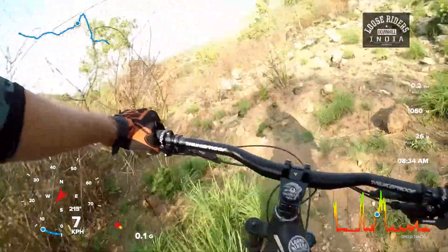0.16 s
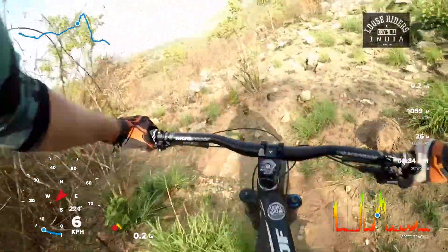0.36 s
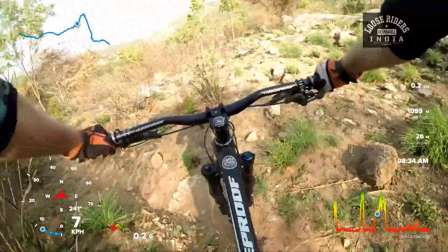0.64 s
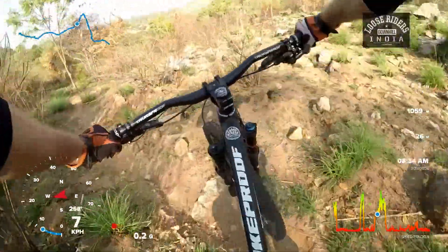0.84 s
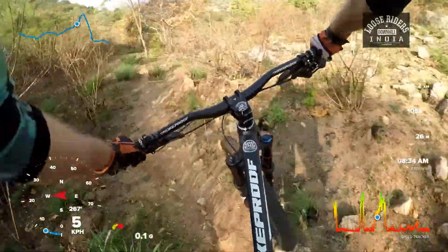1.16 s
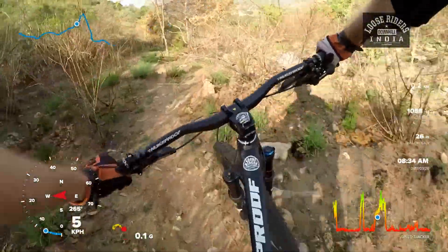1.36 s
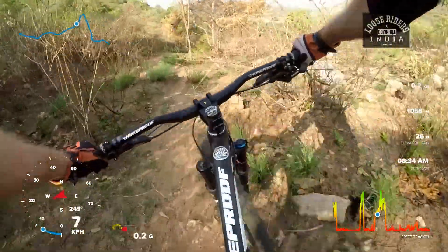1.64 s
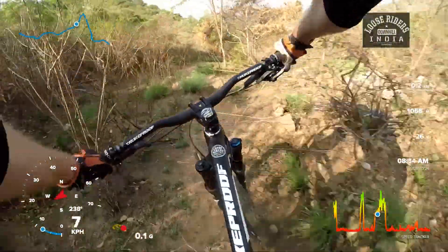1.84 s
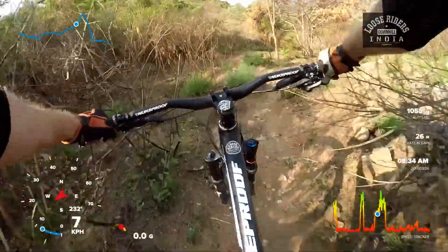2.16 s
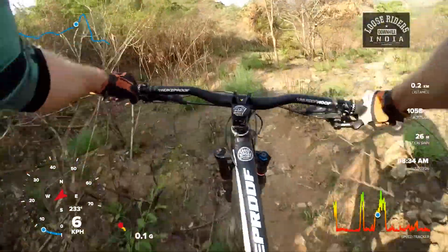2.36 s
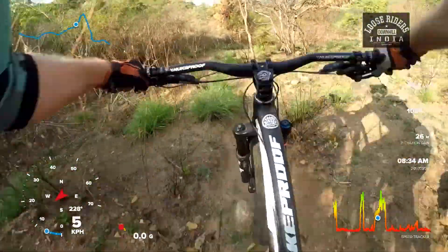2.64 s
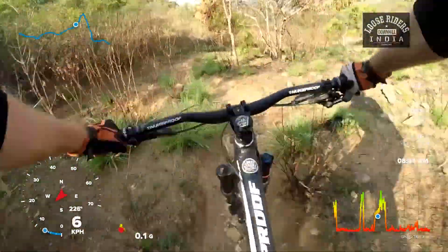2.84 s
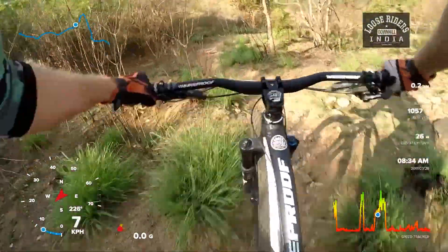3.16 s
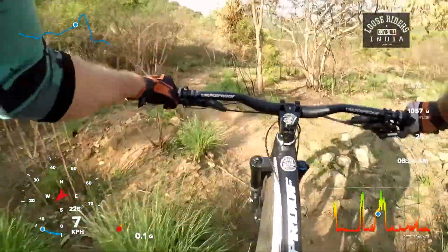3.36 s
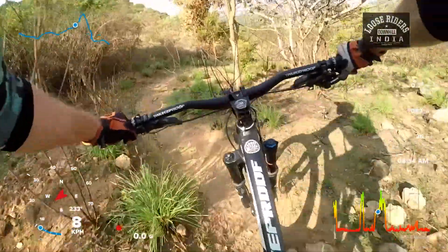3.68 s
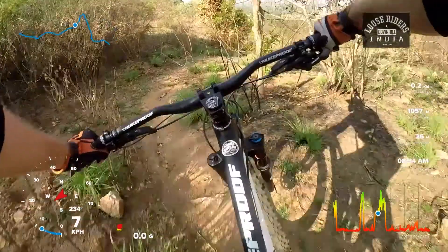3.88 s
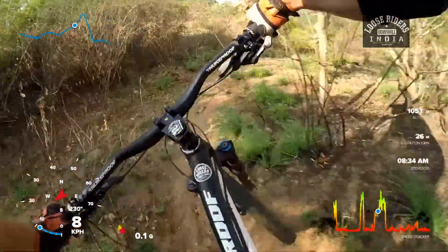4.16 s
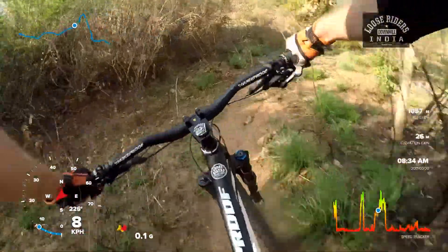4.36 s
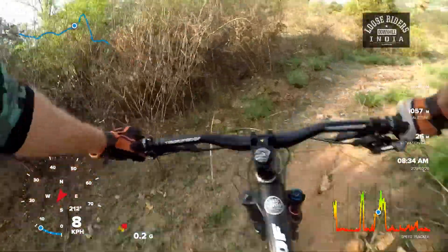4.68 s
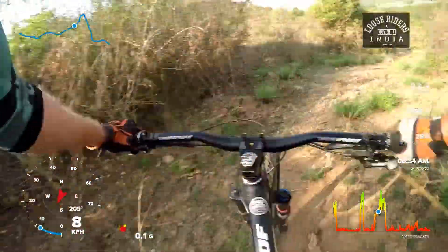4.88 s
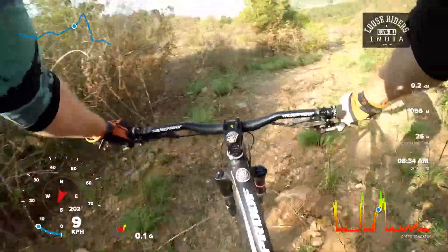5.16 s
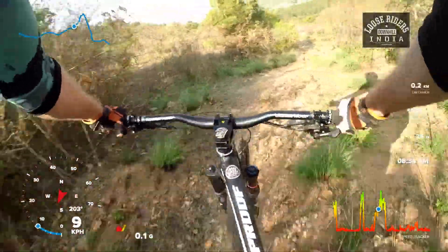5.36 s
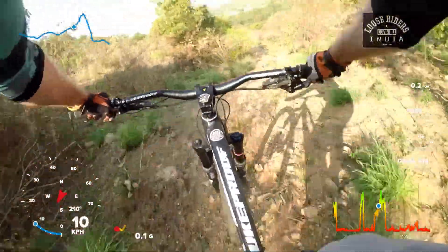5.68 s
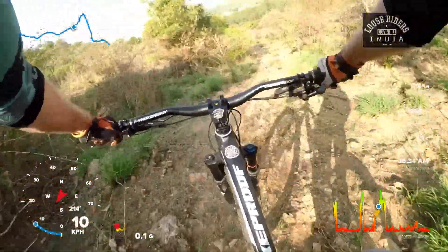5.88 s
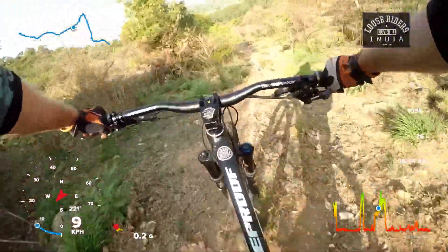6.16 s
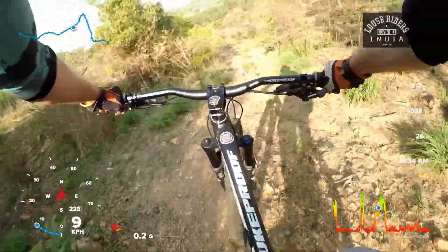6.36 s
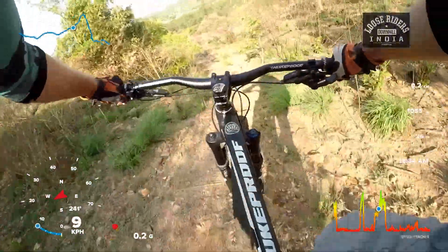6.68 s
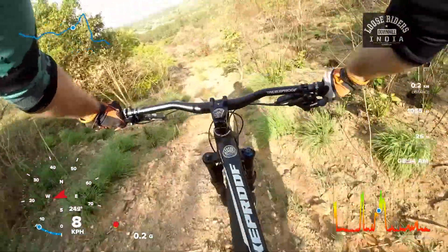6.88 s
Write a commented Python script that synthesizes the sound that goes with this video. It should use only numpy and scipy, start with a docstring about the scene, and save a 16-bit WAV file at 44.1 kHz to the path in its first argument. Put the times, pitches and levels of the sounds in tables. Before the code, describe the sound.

A mountain bike descends a dry rocky trail, heard very close from the rider's chest, outdoors and without echo. The first 0.15 seconds are a dense clatter of knocks, snaps and thuds. Grit then crunches unevenly under the tyres over low, buffeting wind and shuddering straps, with soft frame thuds near 0.3, 0.8 and 1.2. Bright stone cracks cluster around 1.6 to 1.8, another at 2.1, and a heavier thud lands at 2.8. From 3.2 to 4.1 the crunching is thickest, full of snaps, short pings and scrapes, with a strong thud at 3.75. More jolts at 4.4 to 4.7 lead to a sharp ringing knock at 4.77, then sudden near-silence. Faint grit returns from 5.0, gradually building; thuds hit at 6.15 and 6.35, a crisp crack at 6.65, and a last bump at 7.0. Tiny, extremely high brake squeaks flutter now and then.

```python
"""Dry, rocky trail: a mountain bike rolls down it, heard from a chest-mounted camera.
Filtered noise makes wind, strap and frame rumble, and grit crunching under the tyres; noise bursts make
snapping stones and twigs; decaying sines make frame thuds, mount knocks, pings and sideways rocking.
Resonant noise makes scrapes, a fluttering sine the very high brake squeaks.
A sharp knock near 4.77 s is followed by a sudden hush that fills up again slowly."""
import sys
import numpy as np
from scipy import signal
from scipy.fft import rfft, irfft, next_fast_len
from scipy.io import wavfile
from scipy.ndimage import uniform_filter1d, map_coordinates

SR = 44100
rng = np.random.default_rng(int(sys.argv[2]) if len(sys.argv) > 2 else 0)


def unload_audio(sound):
    """Save the sound as a 16-bit wav file, at the path given as the first command line argument."""
    columns = np.transpose(np.atleast_2d(sound))
    # keep every value between -1 and 1, then stretch to whole-number steps
    steps = np.round(np.clip(columns, -1, 1) * 32767)
    wavfile.write(sys.argv[1], SR, steps.astype(np.int16))


N = 310023

# base level of tyre grinding: (time [s], level [dB])
GRIND = [(0, -31), (.28, -39), (.5, -36.5), (.88, -37), (1.18, -42.5), (1.3, -36), (1.75, -37.5),
         (2.1, -40), (2.45, -34), (2.76, -36.5), (3.12, -38), (3.4, -31.5), (3.85, -29.5), (4.1, -35.5),
         (4.6, -35.5), (5.1, -32), (5.5, -44.5), (5.75, -35), (6.1, -40.5), (6.5, -37.5), (6.7, -29),
         (6.8, -40), (7.03, -42.5)]
GAP_DB, GAP_S, LOW_GAP_S = -30, 0.15, 0.039  # short gap at the start of the hush: depth, decay; low-sound decay
SHUDDER_FOLLOWS = 0.71  # dB of shaking per dB of grinding


def amp(db):
    """Gain of a level in dB."""
    return 10 ** (np.asarray(db) / 20)


def unit(x):
    """x at rms 1."""
    return x / np.sqrt(np.mean(x ** 2) + 1e-20)


def along(points, hz):
    """Interpolates (Hz, value) points on a log frequency axis."""
    f, v = np.transpose(points)
    return np.interp(np.log(hz + 1), np.log(f + 1), v)


def clock():
    """Time of each sample in s."""
    return np.arange(N) / SR


def curve(rows):
    """Interpolates (s, value) rows to one value per sample."""
    return np.interp(clock(), *np.transpose(rows))


def wobble(rate_hz):
    """Smooth random curve with rate_hz knots a second."""
    return map_coordinates(rng.standard_normal(int(N * rate_hz / SR) + 4), [np.arange(N) * rate_hz / SR])


def filtered(x, response):
    """x through a complex response of frequency."""
    m = next_fast_len(N + 8192)
    return irfft(rfft(x, m) * response(np.fft.rfftfreq(m, 1 / SR)), m)[..., :N]


def coloured(x, spectrum):
    """x shaped by a (Hz, dB) spectrum, at rms 1."""
    return unit(filtered(x, lambda hz: amp(along(spectrum, hz))))


def add(track, s, sound):
    """Mixes a sound in at time s."""
    part = track[..., round(s * SR):round(s * SR) + sound.shape[-1]]
    part += sound[..., :part.shape[-1]]


def granular(rate_hz, spread_db, life_s, share):
    """Two noise streams with common random bursts of decay life_s, over a share of steady hiss."""
    starts = (rng.random(N) < rate_hz / SR) * amp(spread_db * rng.uniform(-1.1, 1, N))
    bursts = signal.lfilter([1], [1, -np.exp(-1 / (life_s * SR))], starts)
    return (share + unit(bursts)) * rng.standard_normal((2, N))


def hush(gap_db, gap_s, close_s=0.0032):
    """Level change in dB after the sharp knock: a fast fall, a short deep gap, a slow refill."""
    start_s, depth_db, refill_s = 4.7702, -15.5, 1.535
    t = np.maximum(clock() - start_s, 0)
    refill_db = depth_db * np.clip(1 - t / refill_s, 0, 1)
    return np.clip(t / close_s, 0, 1) * (refill_db + gap_db * np.exp(-t / gap_s))


def grinding():
    """Level and fineness of the grinding in dB: each crushed patch of stones is one swell."""
    # patches of stones: (centre [s], swell [dB], length [s], fineness [dB])
    patches = [(0.007, 7, 0.067, 3.5), (.098, 4, .05, -4), (0.375, 7, 0.15, 1.5), (0.602, 5, 0.018, 5),
               (0.828, 4.5, 0.3, -2.5), (1.625, 4.5, 0.077, 6), (1.755, 1, 0.028, 8),
               (1.92, 3.5, 0.26, 1.5), (2.339, 4, 0.088, 5), (2.497, 4.5, 0.16, 2), (2.911, 7, 0.35, -1),
               (3.219, 8, 0.042, -7.5), (3.34, 7, 0.19, -6), (3.525, 3, 0.1, 7), (3.634, -1, 0.06, 9),
               (3.885, 10.5, 0.05, 4), (3.957, 6.5, 0.028, -0.5), (4.056, 11.5, 0.19, -1.5),
               (4.32, 3, 0.12, 1), (4.726, 4.5, 0.13, 5), (4.872, 0, 0.022, 7), (5.02, 7, 0.034, 9.5),
               (5.084, 6.5, 0.035, 9), (5.539, 5.5, 0.078, 2), (5.93, 3, 0.14, 1), (6.043, 4.5, 0.13, -5),
               (6.23, 6, 0.087, 0), (6.577, 5, 0.096, -1.5), (6.655, 3.5, 0.039, 1), (6.954, 7.5, 0.21, -4)]
    s, swell_db, length_s, fine_db = np.transpose(patches)
    swell = np.clip(1 - np.abs(clock()[:, None] - s) / (.5 * length_s), 0, 1)
    return curve(GRIND) + swell @ swell_db, np.sqrt(swell) @ fine_db


def rumble():
    """Wind buffets the ports in lumps; loose straps and frame shudder above it, harder with the grinding."""
    # noise spectra before levelling: (frequency [Hz], level [dB per Hz])
    wind_colour = [(5.9, -30), (10, 2.5), (28, 0.5), (70, -17), (90, -19), (120, -34), (200, -120)]
    shudder_colour = [(41, -34), (70, -6), (113, -5.5), (254, -15.5), (332, -17.5), (450, -20.5),
                      (600, -32.5), (800, -43.5), (1410, -88)]
    # wind strength: (time [s], level [dB])
    gusts = [(0, -13), (.2, -15.5), (.38, -22.5), (.57, -11), (.7, -21), (.88, -12.5), (1.2, -22.5),
             (1.5, -10.5), (1.75, -21.5), (2.3, -16.5), (2.6, -15.5), (2.95, -10.5), (3.3, -15.5),
             (3.55, -14), (3.83, -16), (4.1, -13.5), (4.3, -20), (4.55, -28), (4.7, -16), (5.1, -20.5),
             (5.3, -14.5), (5.55, -22.5), (5.63, -17.5), (5.8, -21.5), (6.07, -22), (6.3, -25), (6.56, -20),
             (6.9, -29), (7.03, -5.5)]
    # shaking on top of its share of the grinding: (time [s], level [dB])
    shake = [(0, 2), (.4, -7), (1.2, -6.5), (2, -9), (2.6, -7), (3, -1), (3.5, -6), (4.2, -6), (4.75, -3),
             (4.9, 0.5), (5.15, -1), (5.4, -9), (5.7, -5.5), (6.2, -7.5), (7.03, -3.5)]
    wind = coloured(rng.standard_normal((2, N)), wind_colour)
    shudder = coloured(granular(rate_hz=60, spread_db=2.0, life_s=0.013, share=0.88), shudder_colour)
    wind_db = curve(gusts) + 4 * wobble(14)
    shudder_db = curve(shake) + SHUDDER_FOLLOWS * grinding()[0] + 1.5 * wobble(20)
    low_hush_db = hush(-28, LOW_GAP_S, close_s=0.029)
    return amp(low_hush_db) * (amp(wind_db) * wind + amp(shudder_db) * shudder)


def pebbles(count, hz, octaves, cycles, spread_db):
    """Two streams of tiny cracks, each a damped sine at its own pitch."""
    when, pitch, size, side = rng.random((count, 4)).T
    pitch_hz = (hz * 2 ** (octaves * (2 * pitch - 1)))[:, None]
    t = np.arange(192)[None] / SR
    rings = np.sin(2 * np.pi * pitch_hz * t) * np.exp(-t * pitch_hz / cycles)
    rings = amp(spread_db * size ** 2)[:, None] * rings
    where = ((when * N).astype(int)[:, None] + np.arange(192)).ravel()
    turn = 2 * np.pi * side[:, None]
    return unit(np.array([np.bincount(where, (rings * w).ravel())[:N] for w in (np.cos(turn), np.sin(turn))]))


def patchy(x, depth_db):
    """Random gain patches, about 860 Hz by 20 ms, that vary the colour of the stones."""
    z = signal.stft(x, nperseg=256)[2]
    field = uniform_filter1d(rng.standard_normal(z.shape[1:]), size=5, axis=0)
    field = uniform_filter1d(field, size=7, axis=1)
    return signal.istft(z * amp(depth_db * unit(field)), nperseg=256)[1][:, :N]


def tyres():
    """One stream of crushed grains in three bands, coarse, middle and fine; the level flutters over the stones."""
    # band spectra before levelling: (frequency [Hz], level [dB per Hz])
    gravel_colour = [(320, -31), (550, 10), (650, -0.5), (934, 7.5), (1490, -3.5), (2000, -35), (2600, -78),
                     (4400, -120)]
    crunch_colour = [(1000, -12), (1700, -9), (1850, -3.5), (2180, -6.5), (2370, -2), (4500, -9),
                     (5850, -16.5), (9900, -120)]
    grit_colour = [(2470, -36), (4200, -14), (5950, 3.5), (6870, 2.5), (11300, -16.5), (13400, -16),
                   (14600, -25), (16000, -66)]
    grind_db, fine_db = grinding()
    swells_db = grind_db - curve(GRIND)
    grains = unit(granular(rate_hz=500, spread_db=3.5, life_s=0.0051, share=0.53))
    cracks = pebbles(count=14000, hz=3500, octaves=1.5, cycles=2.5, spread_db=10)
    grains = grains + amp(-9 + 0.48 * swells_db) * cracks  # rougher in the swells
    grains = patchy(grains, depth_db=2.0)
    # coarse and fine levels against the middle band
    gravel_db = -8 - 1.17 * fine_db + 2.4 * wobble(7)
    grit_db = -4.5 + fine_db + 1.56 * wobble(7.9)
    bands = (coloured(grains, crunch_colour) + amp(gravel_db) * coloured(grains, gravel_colour)
             + amp(grit_db) * coloured(grains, grit_colour))
    return amp(grind_db + hush(GAP_DB, GAP_S) + 0.72 * wobble(35)) * bands


def rocking():
    """Jolts ring two sideways modes; uneven shaking, stronger with the grinding, keeps the lower one murmuring."""
    # sideways jolts: (time [s], level [dB])
    jolts = [(.149, -19), (.263, -17.5), (.523, -18), (.783, -27), (1.092, -17), (1.222, -18), (1.362, -24),
             (1.701, -6.5), (2.076, -13), (2.254, -24), (2.544, -27), (2.827, -14), (2.992, -18.5),
             (3.135, -27), (3.751, -15.5), (3.938, -40.5), (4.278, -16.5), (4.402, -6.5), (4.495, -21),
             (4.633, -14), (4.741, -15), (4.766, -20), (6.15, -12), (6.351, -20), (6.66, -9.5),
             (7.002, -17)]
    # sideways modes of the camera on its mount: (frequency [Hz], t60 [s])
    modes = [(590, 0.099), (1400, 0.035)]
    upper_db, murmur_db, murmur_width_hz = -2, -18.5, 45
    out, t = np.zeros(N), np.arange(SR // 6) / SR
    (low_hz, low_t60), (high_hz, high_t60) = modes
    for s, db in jolts:
        low = amp(-60 * t / low_t60) * np.sin(2 * np.pi * low_hz * rng.normal(1, 0.0038) * t)
        high = amp(upper_db - 60 * t / high_t60) * np.sin(2 * np.pi * high_hz * rng.normal(1, 0.11) * t)
        add(out, s, amp(db) * (1 - np.exp(-t / 0.0037)) * (low + high))
    shake = granular(rate_hz=23, spread_db=14.0, life_s=0.014, share=0.21)[0]
    murmur = filtered(shake, lambda f: 1j * f / (low_hz ** 2 - f * f + 1j * f * murmur_width_hz))
    level_db = SHUDDER_FOLLOWS * grinding()[0] + hush(GAP_DB, GAP_S) + murmur_db
    return amp(hush(GAP_DB, LOW_GAP_S)) * out + amp(level_db) * unit(murmur)


def knocks():
    """The plastic camera mount rings briefly at each knock; hard knocks excite its upper modes more."""
    # knocks: (time [s], level [dB], hardness: gain of the upper modes [dB])
    events = [(.019, -20, 0), (.003, -24, -14), (.033, -30, -14), (.048, -22, -11), (.057, -24, -16),
              (.067, -22, -12.5), (0.092, -13.5, -14), (0.131, -20, -12), (0.263, -27, -11),
              (1.738, -23, -13), (3.727, -19, -2), (3.766, -25, -5), (4.641, -27, 6), (4.792, -45, 16),
              (5.793, -22.5, -2), (5.814, -33, -14), (5.943, -31, -14), (5.957, -29, -16),
              (5.991, -25, -14), (6.006, -19, -16), (6.03, -36, -14), (6.05, -38, -14), (7.003, -25, 10.5)]
    # mount modes, levels before hardness and random spread: (frequency [Hz], level [dB], t60 [s])
    modes = [(960, 0, .018), (1300, -6, .012), (1620, -2, .013), (2400, -7, .01), (5800, -14, .006)]
    out, t = np.zeros(N), np.arange(SR // 20) / SR
    for s, db, hard_db in events:
        ring = np.zeros(len(t))
        for k, (hz, level_db, t60) in enumerate(modes):
            mode_db = level_db + (k > 0) * hard_db + rng.normal(0, 4.5)
            ring += amp(mode_db - 60 * t / t60) * np.sin(2 * np.pi * hz * t)
        add(out, s, amp(db) * (1 - np.exp(-t / 0.000096)) * ring)
    return out


def snaps(count=130):
    """Stones and twigs: a broad crack, then pitched noise and a short ring; count small ones fall at random."""
    # larger snaps: (time [s], nominal level [dB], pitch [Hz], time to fall 11 dB [s])
    large = [(.0095, -16, 1925, 0.0063), (.0185, -15, 3620, 0.0035), (.0478, -12, 2600, 0.0015),
             (.089, -16.5, 1770, 0.013), (.1013, -19, 6500, 0.0041), (.131, -24, 4400, 0.0031),
             (.083, -24, 4500, .004), (.216, -24, 5470, .006), (.3705, -19.5, 2300, 0.0068),
             (.598, -18, 3070, 0.008), (.733, -19, 2880, 0.0063), (.818, -19.5, 4840, .0056),
             (1.6083, -15.5, 4640, 0.017), (1.616, -23, 4770, 0.0035), (1.6217, -11, 5300, 0.002),
             (1.6966, -12, 3220, 0.002), (1.753, -8.5, 4700, 0.0017), (1.76, -6, 5300, 0.0015),
             (1.768, -15, 5750, 0.0027), (2.0743, -10, 5000, 0.0032), (2.3416, -13, 2120, 0.0043),
             (2.351, -13, 4450, 0.0029), (2.365, -27, 6000, 0.0026), (2.4639, -21, 3850, 0.0049),
             (2.548, -36, 5190, 0.0031), (2.672, -20.5, 5900, 0.0067), (2.739, -22, 2120, 0.0042),
             (2.8126, -24.5, 2720, 0.0063), (2.881, -14, 2130, 0.0058), (2.954, -18, 6030, 0.0099),
             (2.9867, -12.5, 4470, 0.0039), (3.22, -18, 1850, 0.012), (3.2518, -22, 3200, .003),
             (3.2793, -29, 2360, 0.0043), (3.3067, -22, 4160, 0.0062), (3.3245, -24, 3500, .002),
             (3.362, -25, 3000, .002), (3.383, -16, 1810, 0.0099), (3.466, -17, 3300, 0.0089),
             (3.4985, -10, 3100, 0.0037), (3.546, -18, 5230, .0059), (3.56, -22, 5100, .0055),
             (3.602, -14.5, 6660, .0024), (3.6248, -16, 5060, 0.0041), (3.6354, -17.5, 4860, 0.011),
             (3.68, -18, 2700, 0.0015), (3.7001, -13, 5760, 0.0065), (3.718, -14.5, 2370, 0.0067),
             (3.7267, -9.5, 4140, 0.0018), (3.7685, -18.5, 4170, 0.0047), (3.8767, -14, 4570, 0.0055),
             (3.8862, -16, 4610, 0.0054), (3.959, -20, 2460, 0.0064), (4.0191, -17, 6660, 0.016),
             (4.03, -23, 2520, 0.011), (4.04, -15, 1300, .004), (4.186, -18, 5760, 0.0052),
             (4.3265, -22, 6140, 0.019), (4.389, -20.5, 6200, 0.036), (4.3995, -19, 3800, 0.0053),
             (4.711, -25, 4130, 0.0036), (4.746, -20, 1200, .006), (4.7565, -18.5, 1190, 0.0077),
             (4.7665, -10, 2240, 0.0033), (4.7675, -16.5, 6000, 0.0019), (4.872, -44.5, 4000, 0.005),
             (4.886, -53, 4000, 0.0033), (5.016, -37, 4450, 0.0051), (5.037, -28, 5700, .0035),
             (5.0756, -17.5, 5130, 0.004), (5.531, -23.5, 5700, 0.0055), (5.594, -30.5, 1300, 0.0051),
             (5.7933, -13.5, 3750, 0.0009), (5.9325, -26, 2200, 0.0024), (5.9335, -21.5, 5300, 0.008),
             (6.22, -22, 2880, .0036), (6.2428, -19, 2500, 0.005), (6.26, -15, 5530, 0.0015),
             (6.402, -25, 3500, .008), (6.43, -22, 2800, 0.0041), (6.568, -22, 2500, .005),
             (6.712, -23, 5500, .005), (6.5406, -18, 5350, 0.006), (6.546, -21, 2500, .005),
             (6.646, -8, 4900, 0.0015), (6.6574, -12, 6350, 0.004), (6.6646, -17, 4000, 0.0021),
             (6.748, -23, 4500, 0.012), (6.9116, -21, 4100, 0.0051), (6.9647, -20, 2670, 0.0074),
             (7.002, -27, 1660, 0.0036)]
    small_s, attack_s, crack_s = 0.0068, .00015, 0.00063
    dull_db, ring_db, crack_db = -5, -8, -6
    out, t = np.zeros((2, N)), np.arange(2048) / SR
    f = np.fft.rfftfreq(len(t), 1 / SR)
    when, size, pitch = rng.random((count, 3)).T
    small_db = (grinding()[0] + hush(GAP_DB, GAP_S))[(when * N).astype(int)] + 2.5 + 5 * size
    small = zip(when * N / SR, small_db, 2200 * 2.8 ** pitch, [small_s] * count)
    for s, db, hz, length_s in [*large, *small]:
        octaves = np.log2((f + 1) / hz)
        colour = amp(np.minimum(9 * octaves, -16 * octaves))
        colour = colour + amp(dull_db - 11.0 * np.abs(np.log2((f + 1) / 1000)))  # duller part
        colour = colour * (1 + 0.62 / (1 + (octaves / 0.25) ** 2))  # peak at own pitch
        colour = colour / (1 + (f / 12500) ** 12)
        noise = irfft(rfft(rng.standard_normal((2, len(t)))) * colour)
        ring = [[1], [0]] * np.sin(2 * np.pi * hz * rng.normal(1, 0.03) * t)  # in the shared stream only
        crack = irfft(rfft(rng.standard_normal((2, len(t)))) * f / (f + 900) / (1 + (f / 7500) ** 4))
        add(out, s, amp(db + crack_db) * np.exp(-t / crack_s) * unit(crack))
        decay = amp(db - 3.5 - 11 * t / length_s) * (1 - np.exp(-t / attack_s))
        add(out, s, decay * (unit(noise) + amp(ring_db) * ring))
    return out


def pings():
    """Clear dying tones, one each, from stones and knocks on the mount, lowered by the hush; airborne, housing."""
    # pings: (time [s], level [dB], pitch [Hz], t60 [s])
    events = [(.0885, -18, 895, 0.027), (0.094, -22, 1050, 0.052), (0.0112, -13, 1890, 0.04),
              (.011, -19, 3530, .03), (.019, -11, 6000, .015), (.028, -10, 6500, .015),
              (.1445, -22, 5200, 0.043), (2.075, -22.5, 3310, 0.039), (2.076, -27, 5500, 0.013),
              (3.2215, -14, 570, 0.021), (3.223, -11, 1040, 0.022), (3.221, -21, 1680, .04),
              (3.324, -9, 2400, .02), (3.3245, -16, 5300, .02), (3.499, -21, 3230, 0.027),
              (3.564, -15, 5150, .02), (3.626, -17, 5000, .02), (3.637, -16, 5800, 0.032),
              (3.864, -19, 3120, .02), (3.947, -16, 2260, 0.045), (3.958, -12.5, 2300, .05),
              (3.979, -24, 2310, .04), (3.992, -18, 2300, .04), (4.034, -16, 1840, .03),
              (4.4, -23, 1450, .02), (4.746, -18.5, 835, 0.033), (4.746, -24, 1700, .02),
              (4.7565, -13.5, 790, .022), (4.757, -16, 1670, 0.027), (4.764, -19, 1670, .02),
              (4.7665, -5.5, 850, .015), (4.7679, 0.5, 1670, 0.049), (4.768, -15, 2360, .015),
              (4.7675, -13.5, 1160, 0.0204), (6.151, -21, 1130, 0.043)]
    housing_hz = 1700  # lower pitches come through the housing
    out, t = np.zeros((2, N)), np.arange(SR // 12) / SR
    for s, db, hz, t60 in events:
        envelope = amp(db - 60 * t / t60) * (1 - np.exp(-t / 0.00046))
        add(out[int(hz < housing_hz)], s, envelope * np.sin(2 * np.pi * hz * t))
    return out * amp(hush(GAP_DB, GAP_S))


def thuds():
    """Soft blows through frame and straps: woody crack, pitched swing with overtone, low push of the camera."""
    # thuds: (time [s], nominal level [dB], pitch [Hz], relative push level [dB], envelope length [s])
    events = [(0.0624, -14, 335, 1, 0.004), (0.09, -6, 260, -8, 0.0047), (.139, -23.5, 196, 4.5, 0.025),
              (0.161, -22, 348, 1, 0.014), (0.262, -11.5, 227, -2, 0.0064), (0.523, -15.5, 225, -1, 0.0078),
              (.541, -23, 332, 3, 0.0051), (0.596, -28.5, 445, 4, 0.031), (0.7837, -8.5, 254, -13, 0.0053),
              (.792, -20.5, 400, 1, 0.0094), (0.798, -27, 200, 9, 0.012), (0.875, -34, 417, -10, 0.0084),
              (0.931, -25, 270, -10, 0.0087), (0.961, -23, 214, 0.5, 0.0077), (1.089, -27, 407, 10, 0.015),
              (1.224, -11, 324, -7.5, 0.0047), (1.698, -25, 386, 7, 0.012), (2.077, -24, 440, 5, 0.014),
              (2.25, -20.5, 312, 8, 0.0091), (2.454, -27, 294, -2, 0.0087), (2.5445, -21, 214, -16, 0.0065),
              (2.642, -13, 224, -36, 0.0086), (2.811, -20, 253, 5, 0.014), (2.831, -6, 197, -20, 0.0068),
              (2.946, -22, 260, -9, 0.012), (2.798, -22, 400, -10, .005), (2.995, -25, 430, -10, .015),
              (3.134, -17, 300, -2, 0.006), (3.215, -19, 225, -26, 0.0096), (3.318, -15.5, 320, -3, 0.0072),
              (3.383, -21.5, 237, 5, 0.021), (3.501, -27, 200, 16.5, 0.032), (3.675, -23, 254, -15, 0.012),
              (3.755, -3, 247, -9.5, 0.0056), (4.267, -20, 200, 1, 0.0074), (4.272, -11.5, 240, -11, 0.016),
              (4.4, -15.5, 432, -2, 0.013), (4.407, -28.5, 470, 17, 0.024),
              (4.4964, -8.5, 218, -10, 0.0057), (4.623, -9.5, 195, -20, 0.015),
              (4.641, -10.5, 258, -4, 0.0059), (4.726, -21.5, 280, 6.5, 0.01),
              (4.822, -36.5, 300, 6, 0.0086), (4.893, -33.5, 206, 14.5, 0.036),
              (5.085, -33.5, 384, 4.5, 0.0059), (5.592, -33, 199, 9, 0.011),
              (5.675, -26.5, 230, -20, 0.0082), (5.705, -30, 297, -10, 0.0064),
              (5.905, -25, 296, -23, 0.0078), (6.007, -29, 380, -10, 0.0072),
              (6.1512, -8, 300, -7.5, 0.0062), (6.168, -12, 217, -24, 0.0094),
              (6.352, -7, 267, -7.5, 0.006), (6.5, -24, 196, 2, 0.015), (6.528, -28, 250, 6, 0.0067),
              (6.548, -12.5, 242, -6, 0.0071), (6.578, -21, 270, -2, 0.0066),
              (6.664, -14.5, 362, -23, 0.003), (7.002, -25, 214, 11, 0.02)]
    push_hz, push_s = 124.3, 0.0063
    woody_db, woody_hz, woody_s = -16, 600, 0.0033  # woody_hz: centre of a random pitch
    out, t = np.zeros((2, N)), np.arange(SR // 8) / SR
    for s, db, hz, push_db, length_s in events:
        overtone = 0.099 * np.sin(2 * np.pi * 1.95 * hz * t + rng.uniform(0, 2 * np.pi))
        swing = np.sin(2 * np.pi * hz * t) + overtone
        u = t / (0.16 * length_s)
        envelope = (u / 2) ** 2.26 * np.exp(0.9 * (2 - u))
        crack_hz = woody_hz * rng.uniform(0.68, 1.426)
        crack = amp(woody_db) * np.exp(-t / woody_s) * np.sin(2 * np.pi * crack_hz * t)
        slow = t / push_s
        push = amp(push_db) * slow * np.exp(1 - slow) * np.sin(2 * np.pi * push_hz * t)
        sides_db = db + rng.normal(0, 1.9, (2, 1))  # random lean to one side
        add(out, s, amp(sides_db) * (envelope * swing + push + crack))
    return out


def scrapes():
    """Rubbing contacts: jerky noise in one resonance each."""
    # scrapes: (time [s], length [s], centre [Hz], width [Hz], nominal level [dB])
    rubs = [(2.47, .07, 2900, 900, -33), (3.54, .1, 1395, 110, -33), (3.545, .05, 2520, 250, -30),
            (3.632, .035, 3800, 700, -27), (3.64, .02, 3000, 250, -32), (3.632, .055, 1900, 250, -31),
            (3.385, .035, 1900, 350, -30), (3.9, .03, 5500, 300, -30), (3.905, .03, 2330, 100, -33),
            (4.07, .065, 1700, 100, -35), (4.67, .075, 4500, 700, -27), (5.3, .2, 850, 200, -52),
            (5.865, .05, 880, 250, -39), (.72, .04, 370, 200, -31)]
    out = np.zeros((2, N))
    for s, length_s, hz, width_hz, db in rubs:
        n = round(length_s * SR)
        f = np.fft.rfftfreq(n, 1 / SR)
        noise = irfft(rfft(rng.standard_normal((2, n))) / (1 + (2 * (f - hz) / width_hz) ** 2), n)
        arch = np.sqrt(np.abs(np.sin(np.pi * np.arange(n) / n)))
        add(out, s, amp(db + 0.69 * wobble(120)[:n]) * arch * unit(noise))
    return out


def brake():
    """Pad on rotor: fast-fluttering squeaks near the top of hearing, each one arch."""
    # squeaks: (time [s], length [s], level before flutter [dB])
    squeaks = [(0.974, 0.028, -32), (1.33, 0.029, -40.5), (1.63, .06, -47), (2.868, 0.11, -31.5),
               (3.127, .035, -49), (3.81, .035, -44), (4.1, 0.037, -47), (5.347, 0.13, -43),
               (6.565, 0.19, -44), (6.96, .1, -37)]
    s, length_s, db = np.transpose(squeaks)
    arch = np.sin(np.pi * np.clip((clock()[:, None] - s) / length_s, 0, 1)) ** 1.3 @ amp(db)
    pitch_hz = 14890 + 90 * wobble(25) + 80 * wobble(250)
    phase = 2 * np.pi * np.cumsum(pitch_hz) / SR
    flutter_db = 7.2 * np.array([wobble(260), wobble(260)])
    return arch * amp(flutter_db) * np.sin(phase)


def ports(shared, apart):
    """Two microphone ports: partly alike, with phase lead and level tilt that depend on frequency."""
    # likeness of the ports: (frequency [Hz], correlation [-1..1])
    alike = [(30, 0.96), (380, 0.64), (480, 1), (750, 0.046), (1000, 0.28), (1400, 0.29), (1900, 0.063),
             (2300, 0.41), (3400, 1), (4500, 0.027), (5200, 0.75), (7000, 0.09), (8500, 0.5), (14000, 0.57)]
    # phase by which left leads: (frequency [Hz], lead [rad])
    lead = [(30, -.3), (430, 0), (600, 3), (1550, 2.5), (1750, -.3), (2100, -1.1), (3000, -.1), (4500, .5),
            (7000, 2), (15000, 1.5)]
    # left minus right: (frequency [Hz], level [dB])
    tilt = [(60, -1), (150, 0.5), (380, 3), (950, 2.5), (2380, 1), (5980, 4.5), (15000, -1.5)]
    turn = lambda hz: np.arccos(np.clip(along(alike, hz), -1, 1)) / 2
    mix = lambda hz: np.array([np.cos(turn(hz)), np.sin(turn(hz))])
    mid, side = filtered(np.array([shared, apart]), mix)
    sign = np.array([[.5], [-.5]])
    return filtered(np.array([mid + side, mid - side]),
                    lambda hz: amp(sign * along(tilt, hz)) * np.exp(1j * sign * along(lead, hz)))


def scene():
    """Air sound enters two ports; blows pass the housing, knocks later at right; rocking is opposed at the sides."""
    shared, apart = rumble() + tyres() + snaps() + scrapes() + brake()
    airborne, housed = pings()
    knock = knocks() + housed
    knock_sides = np.array([knock, np.pad(knock, (8, 0))[:N]])  # right 8 samples late
    housing = [[amp(1.5)], [amp(-0.7)]] * thuds() + knock_sides
    return ports(shared + airborne, apart) + housing + [[amp(1.5)], [-amp(-1.5)]] * rocking()


def record(dry):
    """Soft clipping near full scale, then a band limit."""
    top_hz = 15800
    clipped = dry / (1 + np.abs(dry / 1.02) ** 8) ** (1 / 8)
    return filtered(clipped, lambda hz: hz < top_hz)


dry = scene()
out = record(dry)
unload_audio(out)
```